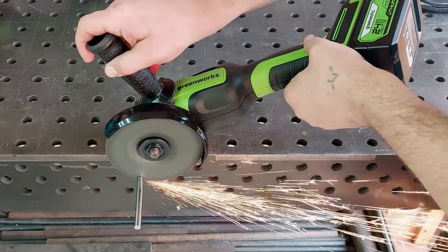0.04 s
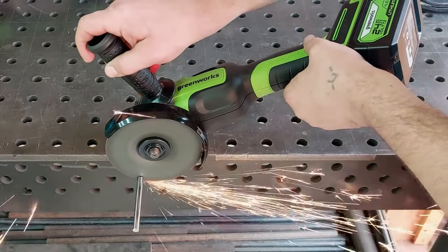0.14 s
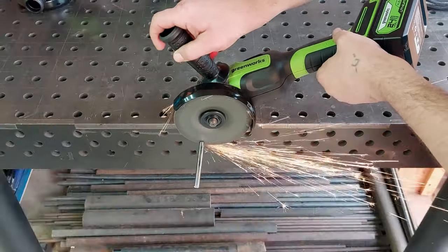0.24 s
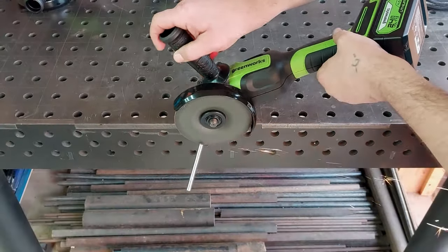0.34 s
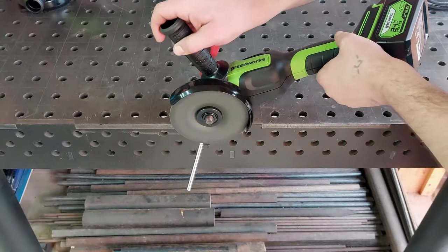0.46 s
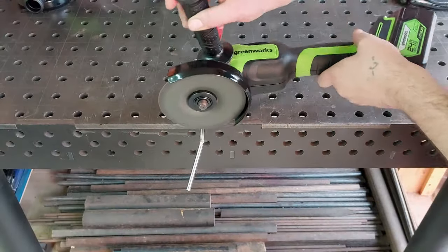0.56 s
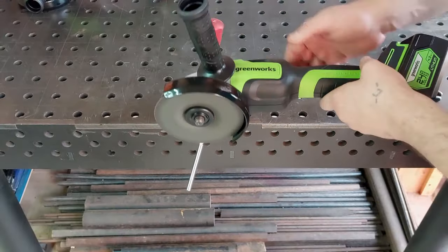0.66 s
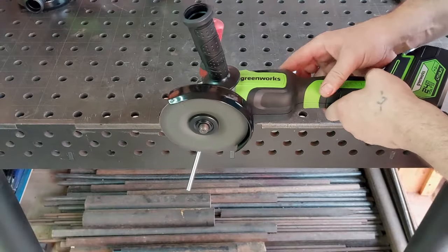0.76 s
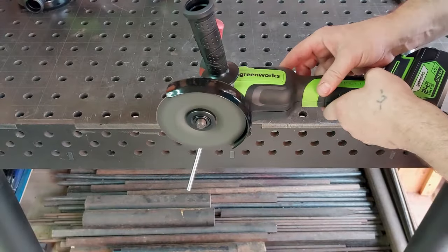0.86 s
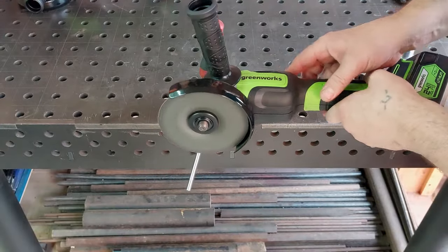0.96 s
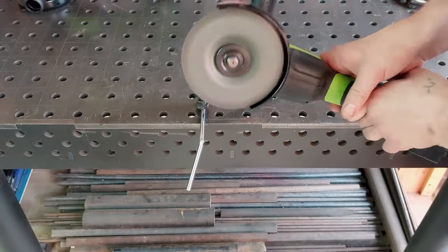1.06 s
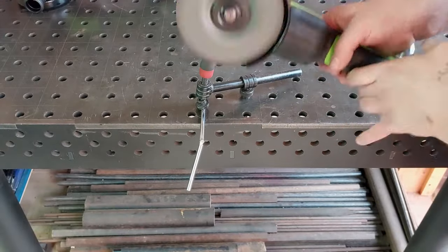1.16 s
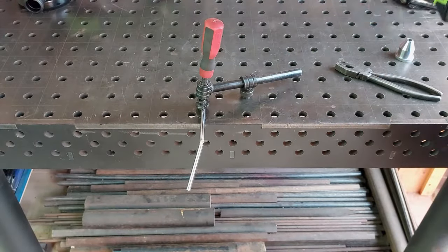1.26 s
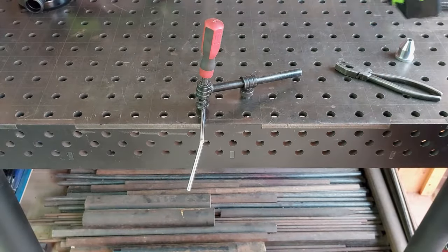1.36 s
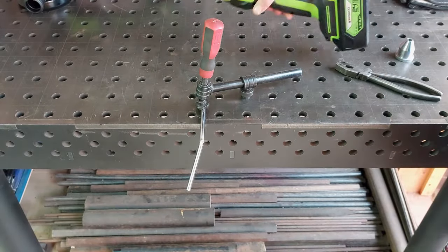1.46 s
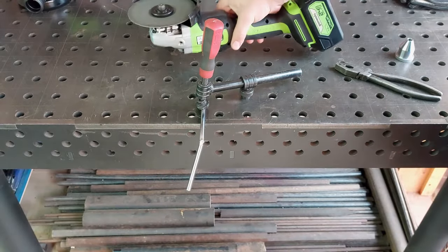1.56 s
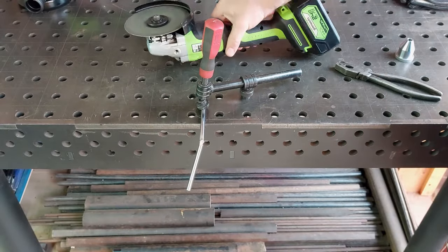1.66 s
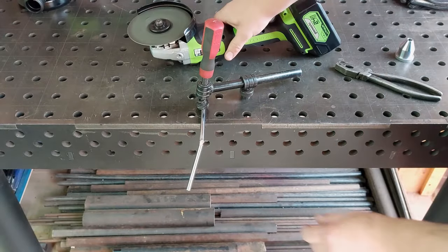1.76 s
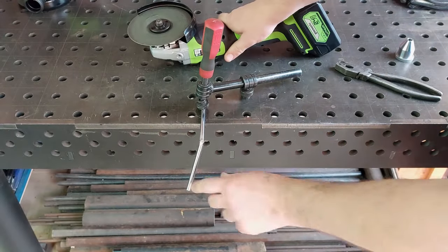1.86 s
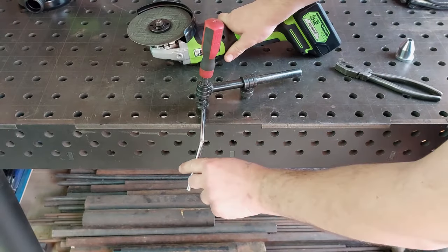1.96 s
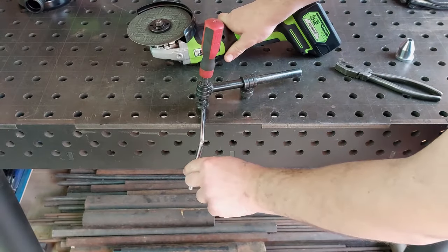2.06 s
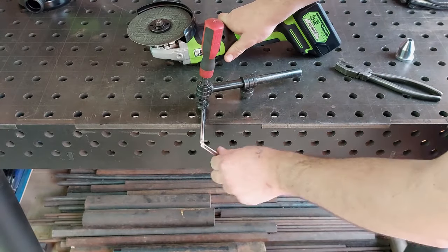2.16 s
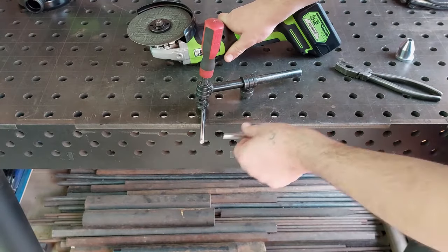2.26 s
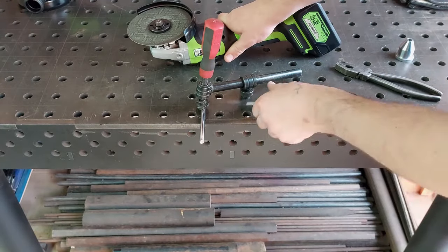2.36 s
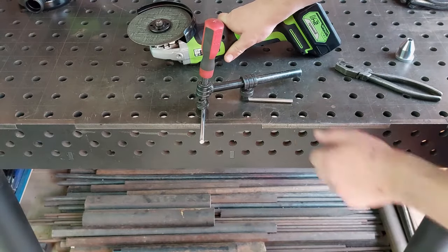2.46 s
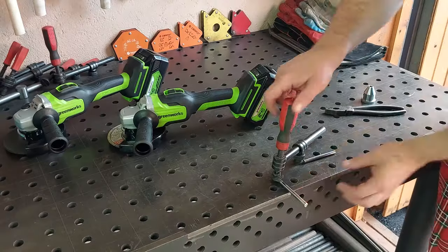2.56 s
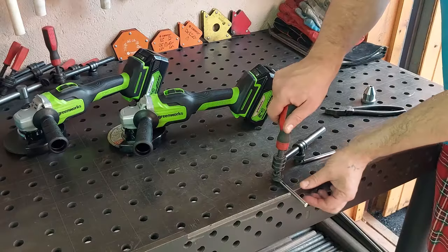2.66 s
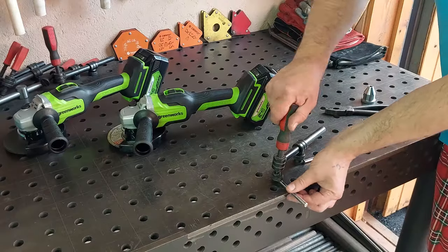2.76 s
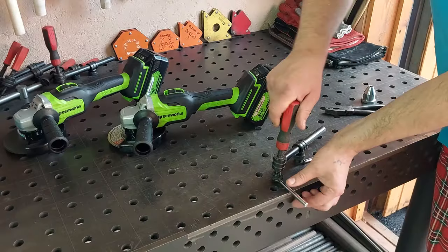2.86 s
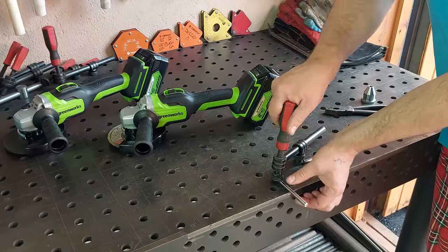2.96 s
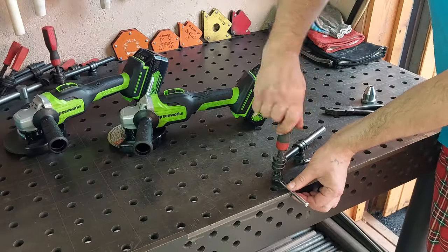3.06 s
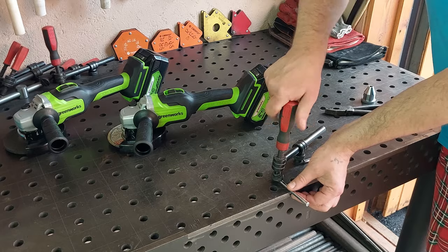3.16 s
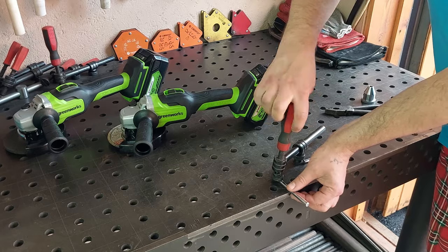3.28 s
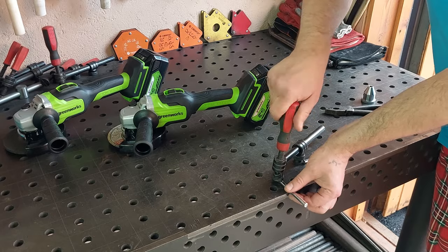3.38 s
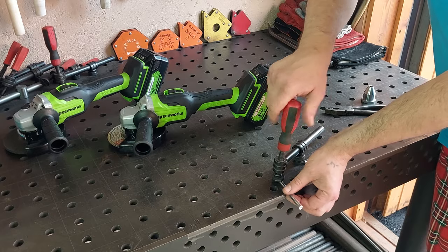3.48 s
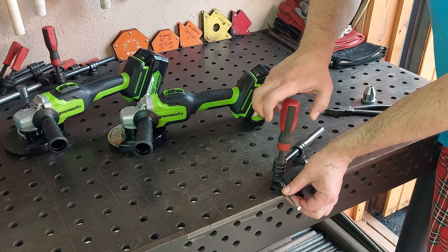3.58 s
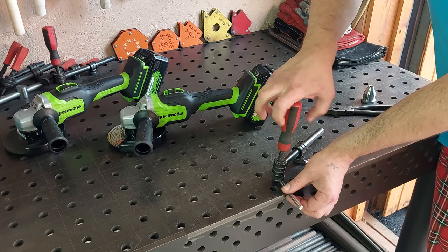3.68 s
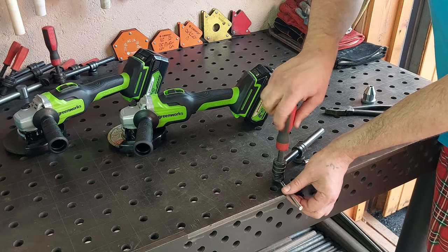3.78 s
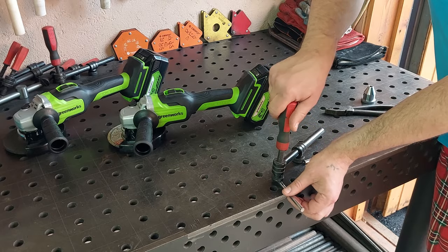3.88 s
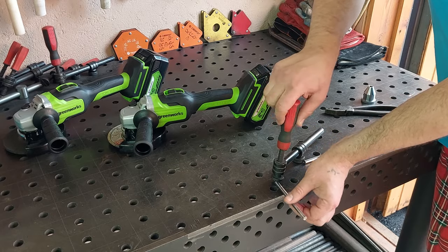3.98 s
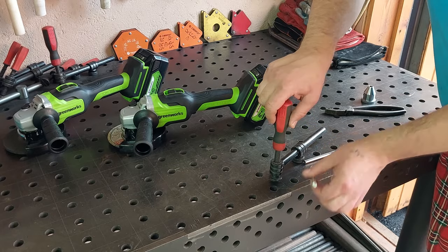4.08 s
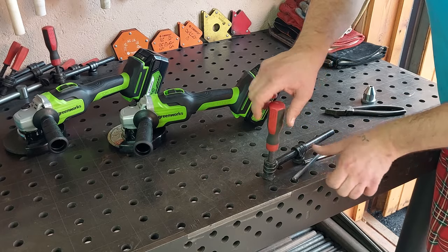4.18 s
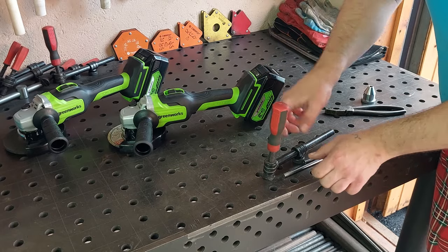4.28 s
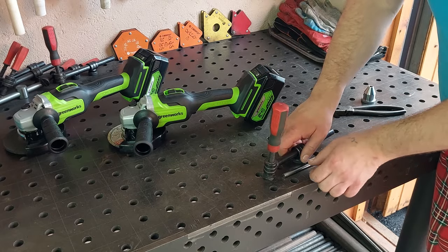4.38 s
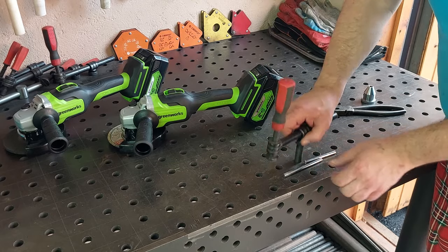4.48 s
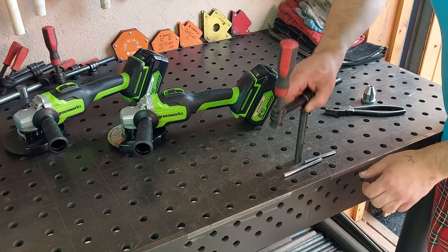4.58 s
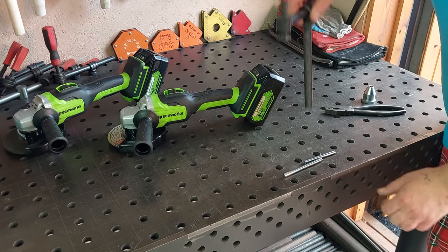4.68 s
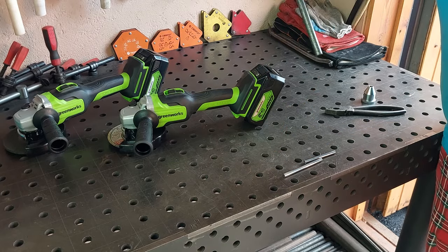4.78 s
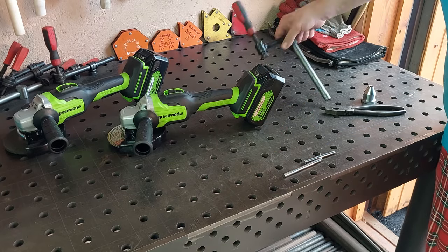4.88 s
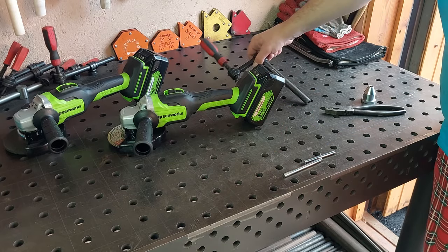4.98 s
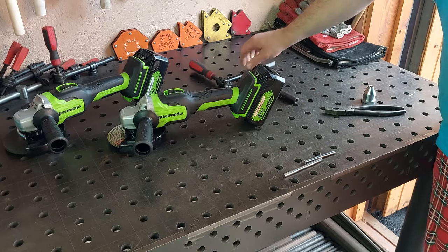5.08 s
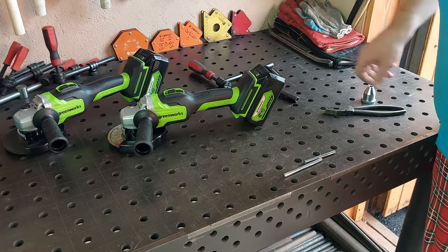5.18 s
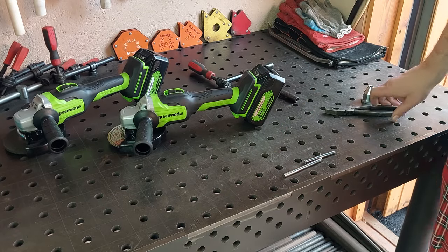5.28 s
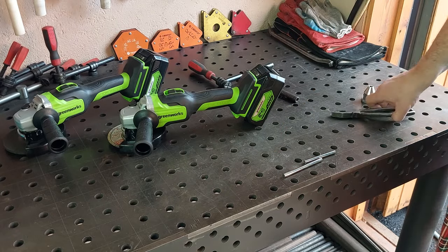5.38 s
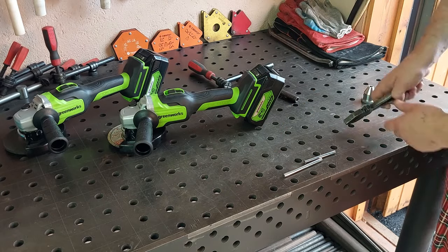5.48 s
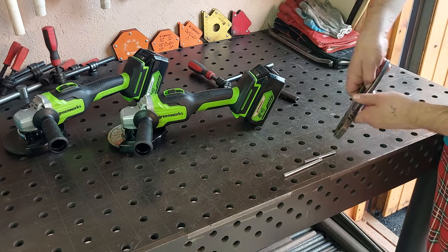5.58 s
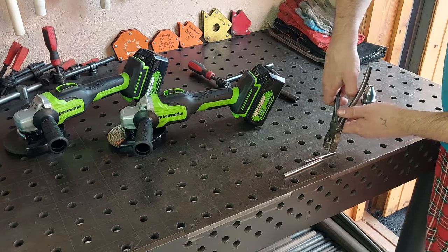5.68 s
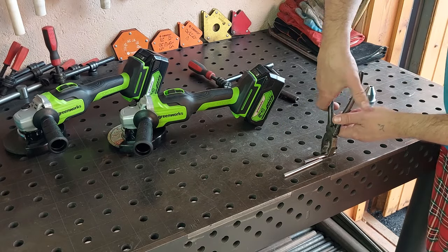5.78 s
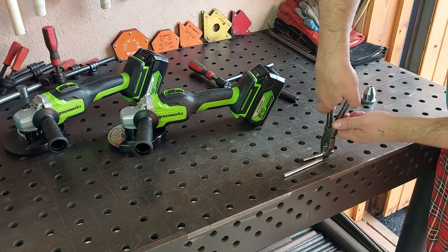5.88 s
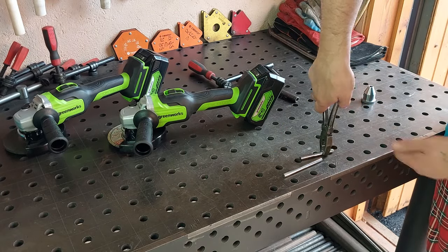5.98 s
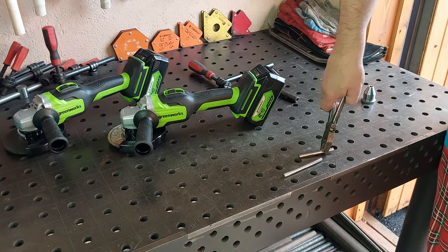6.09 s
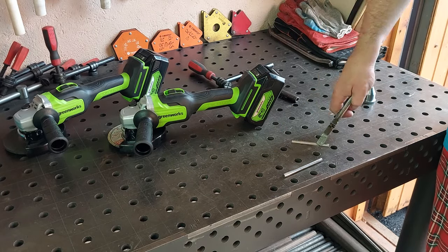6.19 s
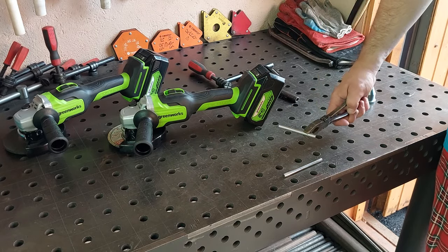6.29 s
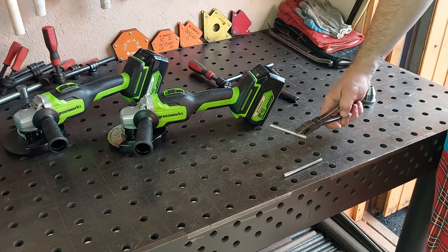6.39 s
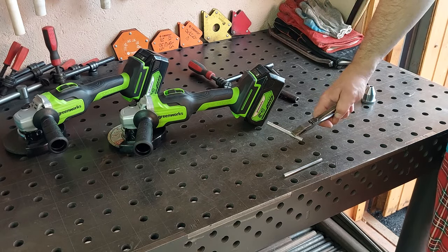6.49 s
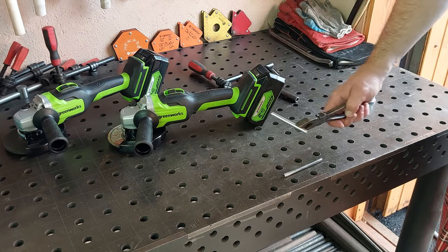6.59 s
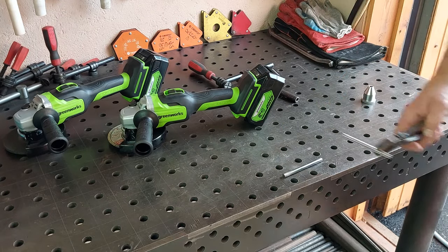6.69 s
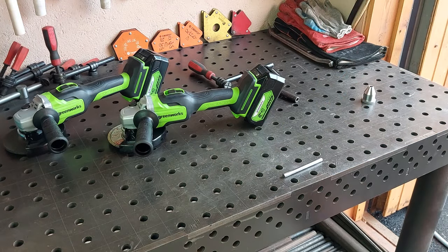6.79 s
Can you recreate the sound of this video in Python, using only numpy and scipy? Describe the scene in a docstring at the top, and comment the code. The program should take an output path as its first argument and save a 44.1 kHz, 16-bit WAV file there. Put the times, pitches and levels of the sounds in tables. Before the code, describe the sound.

Harsh grinding on a steel rod stops, the spinning disc howls down and lands with a clunk, followed by clamp knocks, rod clinks and pliers sliding.

```python
"""Angle grinder and bench work

A cordless angle grinder ends its cut in a steel rod, runs free, is braked and set down on a steel bench.
Then the rod, its clamp and a pair of pliers click, knock and slide; the background steps up on the way.
Grinder: shaped noise and sines on multiples of the rotor rate; braking adds a falling howl of noise bands.
Contacts: bursts of band noise, beside resonators struck by white noise of the same rise and fall.
A short echo, low rumble, murmur and hiss make the small workshop.
"""
import sys
import numpy as np
from scipy import signal
from scipy.fft import rfft, irfft
from scipy.io import wavfile

SR = 44100
rng = np.random.default_rng(int(sys.argv[2]) if len(sys.argv) > 2 else 0)


def unload_wav(signal):
    """Save mono or channel-first audio to the path in sys.argv[1] as 16-bit WAV at rate SR, clipped to [-1, 1]."""
    wavfile.write(
        sys.argv[1],
        SR,
        np.round(np.clip(np.atleast_2d(signal).T, -1, 1) * 32767).astype(np.int16),
    )


N = 301644
T_S = np.arange(N) / SR
HZ = np.maximum(np.fft.rfftfreq(N, 1 / SR), 1)

# Spectra give shape only: wide_noise() scales to rms 1.
# faint steady murmur of the building: f/Hz, density/dB
STILL_SPECTRUM = [(50, -50.5), (100, -17), (190, -4.5), (360, -13), (1000, -22.5), (2250, -35.5),
                  (6000, -44.5), (12000, -77)]
# early rumble and later room murmur: f/Hz, density/dB
LOW_SPECTRUM = [(15, -52.5), (25, -41.5), (127, -9), (344, -8), (427, -20), (516, -11.5), (936, -11.5),
                (1020, -14), (1190, -18), (1520, -12.5), (1700, -24), (1890, -19.5), (2480, -23),
                (3520, -24), (16000, -53.5)]
# resonances of the same: f/Hz, width/Hz, peak/dB
LOW_PEAKS = [(140.1, 55, 7.5), (170, 60, 4.5), (253, 47, 6.5), (370, 20, 9.5), (410, 60, 8.5),
             (513, 17, 10.5), (625, 15, 7.5), (1010, 1.1, 10), (1425, 1.1, 16), (1920, 59, 6.5)]
# low rumble of the cut and grinder, with room murmur, up to STEP_S: t/s, level/dB
EARLY_RUMBLE_LEVEL = [(0, -70), (.17, -72.5), (.24, -93), (.8, -85.5), (.9, -67), (1.0, -79.5),
                      (1.6, -97.5), (1.7, -70), (2.05, -78.5)]
STILL_DB, ROOM_AFTER_DB = -86.5, -62.5
HISS_BEFORE_DB, HISS_AFTER_DB = -94, -83
STEP_S = 2.541  # background steps up
ECHO_DB, ECHO_T60_S = -5, 0.068

# microphone pair, likeness of noise: f/Hz, left-right likeness/1
LIKENESS = [(60, .5), (250, 0.35), (1000, 0.38), (2000, 0.65), (4000, 0.067), (12000, 0.028)]
# microphone pair, colour: f/Hz, left over right/dB
LEAN = [(60, -1.5), (110, 10), (200, 6), (380, 8), (700, 2), (1290, 0), (2380, -2), (4400, 2), (8120, 1.5),
        (15000, 3.5)]
CUTOFF_HZ, HEADROOM = 15700, .95

# heavy blows to the bench: t/s, level/dB
THUMPS = [(1.742, -74.5), (2.543, -60), (4.215, -49.5), (4.518, -64), (5.135, -55), (5.18, -46)]

# Contact columns: t/s, 1.2-4 kHz level/dB, 4-9 kHz level/dB, rise/s, fall by 40 dB/s
# grinder set down: contact columns
GRINDER_DOWN = [(1.7404, -32, -42, 0.0027, .14), (1.8486, -54.5, -63, .004, 0.28),
                (1.937, -47, -70, 0.013, 0.095), (1.9698, -39.5, -39.5, 0.0068, 0.05),
                (1.994, -42, -40.5, 0.006, 0.076), (2.0224, -48, -74, 0.0037, 0.047)]
# notched rod bent until it breaks: contact columns
BEND = [(2.187, -88, -105, 0.003, 0.04533), (2.235, -85.5, -100, .005, 0.096),
        (2.39, -82.5, -74.5, 0.038, 0.23)]
# rod: contact columns
ROD = [(2.4224, -51, -42.5, 0.011, 0.098), (2.4617, -51, -43.5, .0033, 0.088),
       (2.5418, -62.5, -53, 0.0028, 0.12), (4.198, -45, -45.5, 0.0085, 0.23),
       (4.2145, -37.5, -29.5, .004, 0.093), (4.2467, -45, -33, 0.0072, 0.08),
       (4.293, -45, -43.5, 0.007, 0.044), (4.7985, -79, -71.5, .0045, .13)]
# clamp screw turned loose: contact columns
TWISTS = [(3.3117, -54, -54.5, 0.012, 0.14), (3.3413, -47.5, -49.5, 0.0095, 0.08),
          (3.467, -50.5, -57.5, 0.016, 0.11), (3.584, -51.5, -58, 0.013, 0.11),
          (3.608, -61, -74, 0.0073, 0.062), (3.679, -68, -65, 0.0077, 0.16),
          (3.721, -41, -51.5, .015, 0.11), (3.8344, -62, -67, 0.022, 0.17),
          (3.9195, -61, -79, 0.0079, 0.15), (3.9787, -68, -83, .008, .22), (4.0254, -65, -61.5, .014, 0.14)]
# clamp lifted out and laid down: contact columns
CLAMP = [(4.4957, -60, -69, .009, 0.03), (4.5092, -46.5, -50.5, .009, 0.091),
         (4.5166, -39.5, -44.5, .005, 0.18), (4.5494, -42.5, -56, .009, 0.06),
         (4.6074, -47.5, -58, .018, .13), (4.6593, -42.5, -40, .005, 0.082),
         (4.9461, -32.5, -26.5, .004, .13), (4.9824, -51.5, -41.5, .008, 0.096),
         (5.0394, -48, -54.5, .007, 0.027), (5.0686, -41, -31, .004, 0.18),
         (5.137, -17.5, -18, .003, 0.095), (5.1774, -39, -24, .008, 0.091)]
# pliers: contact columns
PLIERS = [(5.3592, -57.5, -59.5, 0.038, 0.089), (5.3901, -70, -82, .006, 0.3),
          (5.7798, -39.5, -66, .005, 0.081), (5.9419, -50.5, -57, .012, 0.1),
          (6.1946, -56, -95, 0.011, 0.12), (6.8294, -62, -57.5, .007, .09)]
# pliers dragged: contact columns
SLIDES = [(5.425, -54, -49.5, 0.05, 0.18), (5.471, -48.5, -50, 0.083, 0.072)]
# soft rustles that hardly ring: contact columns
BRUSHES = [(2.69, -63.5, -56, 0.11, 0.11), (6.63, -73, -69, 0.013, .12), (6.761, -65, -60.5, 0.02, 0.36)]

# Ring columns: f/Hz, width/Hz, relative level/dB
# grinder body: ring columns
GRINDER_RING = [(456, 14, 3.5), (1164, 20, 6.5), (1616, 27, -6.5), (1817, 86, 0), (2780, 77, -4),
                (3240, 240, -22), (4084.5, 22, 2.5), (4312.5, 53, -2.5), (5000, 38, 1), (5736, 53, 11.5),
                (7700, 43, -8), (9100, 83, -25), (10000, 52, 2), (11000, 46, -8)]
# bent rod: ring columns
BEND_RING = [(2840, 100, 0.5), (3560, 76, -9), (5150, 120, 0), (6000, 90, 17)]
# rod: ring columns
ROD_RING = [(2920, 200, 3.5), (3480, 240, -1.5), (4130, 138, 2), (5092, 83.36, -23), (6000, 130, -8),
            (6940, 530, 1), (8670, 180, 0), (9040, 70, -11.5), (10860, 99, 0.5), (11660, 160, -3),
            (13920, 250, -6)]
# clamp: ring columns
CLAMP_RING = [(420, 13, -21), (640, 24, -3.5), (789, 39, 4), (1043, 27, 2.5), (1376.7, 22, -9.5),
              (1568.6, 15, -9), (1709, 26, 2.5), (1800, 30, -5.5), (2122.5, 64, -5), (2270.1, 40, -5),
              (2454, 40, -2.5), (2695, 30, -2.5), (3031, 62, -3), (3692.5, 60, -13), (4542.8, 74, -6),
              (4960, 190, -8), (6280, 55, -2.5), (6590, 54, -1), (8140, 30, -6.5), (8830, 50, -3.5),
              (8940, 79, -7), (11600, 99, -5)]
# pliers: ring columns
PLIERS_RING = [(1060, 60, -13.5), (1707, 50, -1.5), (2110, 51, -8), (2337, 64, 1.5), (2680, 60, -8.5),
               (2985, 63, -15.5), (3790, 63, -17.5), (4530, 37, 7.5), (6400, 91, -2.5)]
SOFT_LOSS_DB_PER_DB = 0.39  # ring above 4 kHz lost per dB of softer touch

# Balance of each contact kind:
# bass over 1.2-4 kHz/dB, over 9 kHz against 4-9 kHz/dB, left over right/dB, relative ring/dB
GRINDER_TOUCH = (-14.5, -3.5, -1.5, -2.5)
BEND_TOUCH = (-2, -18, -2, 13)
ROD_TOUCH = (-16, 0, -0.5, -1)
TWIST_TOUCH = (-7, -1, -0.5, -2)
CLAMP_TOUCH = (-10.5, -1.5, -1.5, -1.5)
PLIERS_TOUCH = (-14, -4, -1, 2)
SLIDE_TOUCH = (-14, -8, -.5, 3)
BRUSH_TOUCH = (-8, 0.5, -1, -20)

LOADED_TURNS_PER_S, FREE_TURNS_PER_S, CREEP_TURNS_PER_S = 415.8, 425.3, 30
CUT_END_S, BRAKE_S, FRICTION_S = .392, .862, 1.52
SPIN_UP_TAU_S, BRAKING_TAU_S = .025, .375
FRICTION_TURNS_PER_S2 = 92  # bearing friction near standstill
TONES_END_S = 2.2

# disc grit: f/Hz, density/dB
GRIT_SPECTRUM = [(120, -50), (300, -35), (570, -41.5), (1000, -43), (1800, -14), (2600, -14), (3150, -17.5),
                 (3700, -9.5), (4600, -16.5), (5100, -7.5), (6500, -4.5), (9000, -8), (13500, -7.5),
                 (16000, -14.5)]
# disc and rod under the cut: f/Hz, width/Hz, peak/dB
DISC_PEAKS = [(1857, 30, 14), (1905, 30, 11), (3601, 25, 11), (3747, 25, 8), (5001, 30, 10), (5720, 35, 12),
              (6580, 40, 9), (6670, 60, 9), (7480, 40, 10), (13300, 70, 10), (13745, 70, 10)]
# throb of the cut: multiple of rotor rate/1, relative level/dB
THROB_ORDERS = [(1, -41), (2, -25.5), (3, -28), (4, -19.5), (5, -16.5), (6, -18.5), (7, -15.5), (8, -12),
                (9, -16), (10, -10), (11, -33), (12, 1.5), (13, -1.5), (14, -14), (15, -0.5), (16, -4.5),
                (17, -4.5), (18, -5), (19, -2.5), (20, 3.5), (21, -9), (22, -3.5), (23, -12), (24, -24),
                (25, -4), (26, -5.5), (27, -7), (28, 0), (29, -5.5), (30, -7), (31, -9), (32, -9.5),
                (33, -6), (34, -7), (35, -5), (36, -14), (37, -10)]
CUT_DB, THROB_DB, CUT_RELEASE_DB_PER_S = -37.5, -15, 900

# air and gear rush: t/s, level/dB
RUSH_LEVEL = [(0, -42.5), (.45, -43), (.75, -41), (.85, -36.5), (.87, -38.5), (1.3, -44), (1.5, -45.5),
              (1.75, -50), (1.87, -59.5), (1.95, -49), (2.04, -49), (2.1, -95), (2.2, -120)]
# rush at full speed: f/Hz, density/dB
RUSH_FAST_SPECTRUM = [(88, -87), (150, -51), (361, -56), (422, -22), (545, -53.5), (612, -32.5),
                      (1390, -17), (2060, -18.5), (3350, -15.5), (3550, -13.5), (3840, -10.5),
                      (11300, -9.5), (16000, -11)]
# rush near standstill: f/Hz, density/dB
RUSH_SLOW_SPECTRUM = [(88, -64), (150, -30.5), (448, -29), (514, -25), (662, -22), (1020, -23.5),
                      (1420, -2), (2270, -17), (2650, -5), (6020, 2.5), (8730, -4.5), (11700, 3),
                      (16000, -11.5)]
# guard and housing: f/Hz, width/Hz, peak/dB before the exponents in rush()
HOUSING_PEAKS = [(644.6, 200, 17.5), (1370, 190, 11.5), (3083, 1800, 1.5), (5920, 170, 16), (6480, 400, 10),
                 (7440, 200, 8.5), (10240, 140, 13), (11600, 300, 8.5), (15170, 360, 3)]

# gear and winding tones: t/s, level/dB
WHINE_LEVEL = [(0, -63), (.42, -61), (.61, -49), (.86, -47), (.9, -51), (1.2, -57), (1.6, -60), (1.72, -66),
               (1.8, -99)]
# gear and winding tones: multiple of rotor rate/1
GEAR_ORDERS = [1, 2, 3.254, 5.354, 8.608, 17.22, 25.82, 27.02, 34.43, 51.65, 60.26]
# one row per order: driven level/dB, braked level/dB, casing resonance f/Hz, width/octaves
GEAR_BALANCE = [(-38, -50, 400, 1), (-34, -50, 800, 1), (-16, -12, 1150, .25), (-18, -40, 2200, 1),
                (0, 0, 2700, .95), (-19, -3, 3950, .33), (-11, 3, 7350, .12), (-15, -40, 11000, 1),
                (-12, -1, 2950, .25), (-40, 9, 7500, .15), (-40, 8, 7300, .1)]

# brake howl: t/s, level/dB
HOWL_LEVEL = [(0, -90), (.84, -55), (.87, -36.5), (1.15, -44), (1.25, -44.5), (1.5, -53.5), (1.65, -53),
              (1.85, -100)]
# howl bands: multiple of rotor rate/1, width/Hz, relative level/dB
HOWL_BANDS = [(33.0, 1500, 1.5), (45.0, 2200, -5), (65.0, 2500, -10)]
# body lit up by the howl: f/Hz, width/Hz, peak/dB
HOWL_BODY = [(5800, 350, 11), (6600, 500, 9), (7900, 700, 12), (10100, 450, 12), (12000, 1100, 12),
             (15300, 800, 8)]
KNOCK_SCALE_DB, KNOCK_SHARPNESS = 8.0, 3.0  # gain swings over -0.5 to 1.5 times the scale
KNOCK_START_S, KNOCK_END_S = 1.08, 1.22


def amp(db):
    """dB to gain."""
    return 10 ** (np.asarray(db) / 20)


def rms_one(x):
    """Scale to rms 1."""
    return x / np.sqrt(np.mean(x ** 2) + 1e-20)


def in_time(rows):
    """Level of a (t, level) table at every sample."""
    t_s, level = np.transpose(rows)
    return np.interp(T_S, t_s, level)


def at_hz(points, hz):
    """Spectrum interpolated over log frequency."""
    points_hz, values = np.transpose(points)
    return np.interp(np.log(hz), np.log(points_hz), values)


def bumps(peaks, hz):
    """Gain of a body: flat plus its resonances, added in power."""
    power = 1
    for peak_hz, width_hz, db in peaks:
        power = power + (amp(2 * db) - 1) / (1 + ((hz - peak_hz) / width_hz * 2) ** 2)
    return np.sqrt(power)


def drift(knots_per_s):
    """Random wander: unit normal knots joined by straight lines."""
    knots = rng.standard_normal(int(N / SR * knots_per_s) + 2)
    return np.interp(T_S * knots_per_s, np.arange(len(knots)), knots)


def wide_noise(gain, grain=1):
    """Stereo noise of rms 1 with a spectral gain, a time grain and the pair's likeness."""
    mid, side = rfft(rng.standard_normal((2, N)) * grain)
    alike = np.clip(at_hz(LIKENESS, HZ), 0, 1)
    pair = np.sqrt(1 + alike) * mid + np.sqrt(1 - alike) * side * [[1], [-1]]
    return rms_one(irfft(gain * pair, N))


def background():
    """Building murmur, resonant low noise (early rumble, later room murmur) and microphone hiss."""
    after = T_S > STEP_S
    still = amp(STILL_DB) * wide_noise(amp(at_hz(STILL_SPECTRUM, HZ)))
    low = wide_noise(amp(at_hz(LOW_SPECTRUM, HZ)) * bumps(LOW_PEAKS, HZ))
    low *= amp(np.where(after, ROOM_AFTER_DB, in_time(EARLY_RUMBLE_LEVEL)) + drift(3.6))
    hiss = amp(np.where(after, HISS_AFTER_DB, HISS_BEFORE_DB)) * rng.standard_normal((2, N))
    return still + low + hiss


def workshop(x):
    """Short dense echo: each channel convolved with its own decaying noise."""
    t_s = np.arange(SR // 4) / SR
    tail = wide_noise(1)[:, :len(t_s)] * amp(-60 * t_s / ECHO_T60_S) * (t_s > .004)
    tail /= np.sqrt(np.sum(tail ** 2, axis=1, keepdims=True))
    return amp(ECHO_DB) * signal.fftconvolve(x, tail, axes=1)[:, :N]


def thumps():
    """Heavy blows shake the bench: a 125 Hz swing that dies within a few cycles."""
    clicks = np.zeros(N)
    for at_s, db in THUMPS:
        clicks[int(at_s * SR)] = amp(db)
    t_s = np.arange(SR // 8) / SR
    swing = np.sin(2 * np.pi * 125 * t_s) * np.exp(-t_s / 0.007)
    return np.convolve(clicks, swing)[:N]


def ring_mode(hz, width_hz, push):
    """One body mode: a two-pole resonator; its width sets the decay."""
    r = np.exp(-np.pi * width_hz / SR)
    edge = np.sqrt(1 - r * r)
    poles = [1, -2 * r * np.cos(2 * np.pi * hz / SR), r * r]
    return signal.lfilter([edge, 0, -edge], poles, push + 1e-18) * .5


def contacts(events, touch, modes, bands):
    """Each touch: band noise that falls steeply then slower, beside modes struck by like-shaped white noise."""
    out, push_level = np.zeros((2, N)), np.zeros((len(modes), 2, N))
    t_s = np.arange(SR // 2) / SR
    chance_db = rng.standard_normal((len(events), len(modes)))
    bass_db, top_db, pan_db, ring_db = touch
    pan = amp([[pan_db / 2], [-pan_db / 2]])
    for (at_s, mid_db, high_db, rise_s, fall_s), event_chance_db in zip(events, chance_db):
        at = int((at_s - 0.8 * rise_s) * SR)
        span = slice(at, at + len(t_s))
        fall = amp(-40 * (np.maximum(t_s - rise_s, 0) / fall_s) ** 0.84)
        shape = np.clip(t_s / rise_s, 0, 1) ** 1.4 * fall
        sides = pan * shape[:N - at]
        levels_db = [mid_db + bass_db, mid_db, high_db, high_db + top_db]
        out[:, span] += sides * np.tensordot(amp(levels_db), bands[:, :, span], 1)
        for k, (hz, _, db) in enumerate(modes):
            # a mode takes the level of its band; soft touches hardly wake high modes
            mode_db = levels_db[np.searchsorted([1200, 4000, 9000], hz)]
            mode_db += SOFT_LOSS_DB_PER_DB * min(mid_db + 25.5, 0) * (hz > 4000)
            push_level[k, :, span] += sides * amp(mode_db + ring_db + db + event_chance_db[k])
    white = wide_noise(1)
    for (hz, width_hz, _), level in zip(modes, push_level):
        out += ring_mode(hz, width_hz, level * white)
    return out


def bench():
    """All touched bodies; their bursts share four bands of uneven chatter."""
    edges_hz = [(320, 1200), (1200, 4000), (4000, 9000), (9000, 17000)]
    grain = amp(1.4 * drift(500))
    bands = []
    for low_hz, high_hz in edges_hz:
        gain = 1 / np.sqrt((1 + (low_hz / HZ) ** 10) * (1 + (HZ / high_hz) ** 10))
        bands.append(wide_noise(gain, grain))
    kinds = [(BRUSHES, BRUSH_TOUCH, BEND_RING), (SLIDES, SLIDE_TOUCH, PLIERS_RING),
             (PLIERS, PLIERS_TOUCH, PLIERS_RING), (CLAMP, CLAMP_TOUCH, CLAMP_RING),
             (TWISTS, TWIST_TOUCH, CLAMP_RING), (ROD, ROD_TOUCH, ROD_RING),
             (BEND, BEND_TOUCH, BEND_RING), (GRINDER_DOWN, GRINDER_TOUCH, GRINDER_RING)]
    bands = np.array(bands)
    return sum(contacts(events, touch, modes, bands) for events, touch, modes in kinds)


def rotor():
    """Turns per s: held down by the cut, recovering when free, dying away under brake and friction."""
    recovery = np.exp(-np.maximum(T_S - CUT_END_S, 0) / SPIN_UP_TAU_S)
    driven = FREE_TURNS_PER_S - (FREE_TURNS_PER_S - LOADED_TURNS_PER_S) * recovery
    braking = np.exp(-np.maximum(T_S - BRAKE_S, 0) / BRAKING_TAU_S)
    braked = CREEP_TURNS_PER_S + (driven - CREEP_TURNS_PER_S) * braking
    return np.maximum(braked - FRICTION_TURNS_PER_S2 * np.maximum(T_S - FRICTION_S, 0), 0)


def tones(orders, levels, turns_per_s, flutter):
    """Sines on multiples of the rotor rate, with a phase offset between the microphones."""
    angle, out = 2 * np.pi * np.cumsum(turns_per_s) / SR, 0
    for multiple, level in zip(orders, levels):
        audible = multiple * turns_per_s < CUTOFF_HZ
        phase = rng.uniform(0, 2 * np.pi) + rng.normal() * np.array([[0], [1]])
        sine = np.sqrt(2) * np.sin(multiple * angle + phase)
        out = out + level * flutter() * audible * sine
    return out


def howl(turns):
    """Noise bands on high rotor orders sweep down through the resonances; for a while one burst a turn."""
    out, angle = 0, 2 * np.pi * np.cumsum(turns) / SR
    for multiple, width_hz, db in HOWL_BANDS:
        band = wide_noise(1 / (1 + (HZ / width_hz) ** 4))
        out = out + amp(db) * band * np.sin(multiple * angle) * (multiple * turns < SR / 2)
    knock_times_s = [KNOCK_START_S - .06, KNOCK_START_S, KNOCK_END_S, KNOCK_END_S + 0.051]
    scale_db = KNOCK_SCALE_DB * np.interp(T_S, knock_times_s, [0, 1, 1, 0])
    burst = np.exp(KNOCK_SHARPNESS * (np.cos(angle + 0.26 * drift(90)) - 1))
    out = out * amp(scale_db * (2 * burst - 0.5))
    out = irfft(rfft(out) * bumps(HOWL_BODY, HZ), N) * 0.49
    return amp(in_time(HOWL_LEVEL)) * out


def gear_whine(turns):
    """Gear and winding tones; braking current shifts their balance and each peaks at a casing resonance."""
    on = int(TONES_END_S * SR)
    braked = np.clip((T_S[:on] - BRAKE_S) / .04, 0, 1)
    levels = []
    for multiple, (driven_db, braked_db, hz, width_oct) in zip(GEAR_ORDERS, GEAR_BALANCE):
        nearness = np.exp(-(np.log2(multiple * turns[:on] / hz) / width_oct) ** 2)
        levels.append((1 - braked) * amp(driven_db) + braked * amp(braked_db) * nearness)
    out = np.zeros((2, N))
    out[:, :on] = tones(GEAR_ORDERS, levels, turns[:on], lambda: amp((2.5 + 1.6 * braked) * drift(35)[:on]))
    return amp(in_time(WHINE_LEVEL)) * out


def rush(turns):
    """Air and gear noise through the housing; its spectrum crossfades as the fan slows."""
    fast = np.clip(turns / 425, 0, 1) ** 1.5
    housing = bumps(HOUSING_PEAKS, HZ)
    out = np.sqrt(fast) * wide_noise(amp(at_hz(RUSH_FAST_SPECTRUM, HZ)) * housing ** 0.53)
    out += np.sqrt(1 - fast) * wide_noise(amp(at_hz(RUSH_SLOW_SPECTRUM, HZ)) * housing ** 0.51)
    return amp(in_time(RUSH_LEVEL) + drift(9.2)) * out


def cut(turns):
    """Disc on steel: unevenly tearing grit noise plus a throb on rotor orders, until the cut ends."""
    on = int(TONES_END_S * SR)
    out = wide_noise(amp(at_hz(GRIT_SPECTRUM, HZ)) * bumps(DISC_PEAKS, HZ), amp(3.9 * drift(900)))
    orders, order_db = np.transpose(THROB_ORDERS)
    unsteady_turns = (turns * (1 + .002 * drift(30)))[:on]
    throb = tones(orders, amp(order_db), unsteady_turns, lambda: amp(3.2 * drift(15))[:on])
    out[:, :on] += amp(THROB_DB) * throb
    level_db = CUT_DB - np.clip(CUT_RELEASE_DB_PER_S * (T_S - CUT_END_S), 0, 100)
    return amp(level_db + drift(11)) * out


def grinder():
    """Howl, whine, rush and cut, tied to one rotor speed."""
    turns = rotor()
    return howl(turns) + gear_whine(turns) + rush(turns) + cut(turns)


def scene():
    """Bench and grinder with their echo, over the background."""
    near = thumps() + bench() + grinder()
    return background() + workshop(near) + near


def record(dry):
    """Microphone pair: opposite colour per side, soft peak rounding, steep low-pass."""
    lean = amp(at_hz(LEAN, HZ) / 2 * np.array([[1], [-1]]))
    coloured = irfft(rfft(dry) * lean, N)
    rounded = HEADROOM * np.tanh(coloured / HEADROOM)
    low_pass = signal.ellip(12, .5, 50, CUTOFF_HZ, fs=SR, output="sos")
    return signal.sosfilt(low_pass, rounded)


dry = scene()
out = record(dry)
unload_wav(out)
```